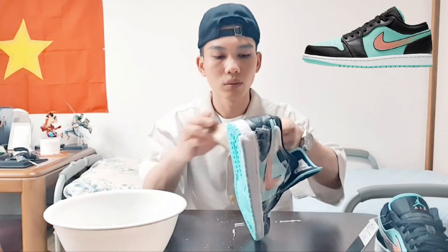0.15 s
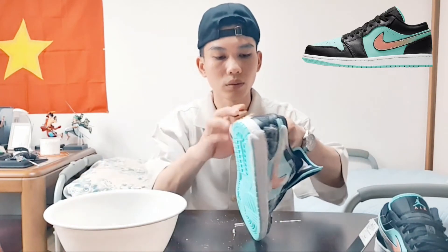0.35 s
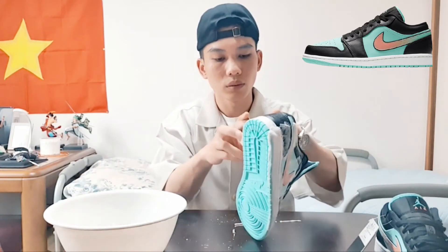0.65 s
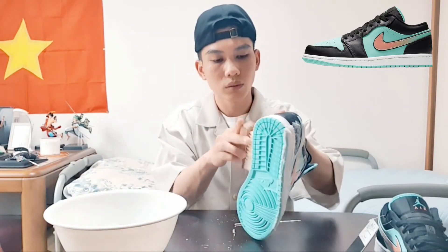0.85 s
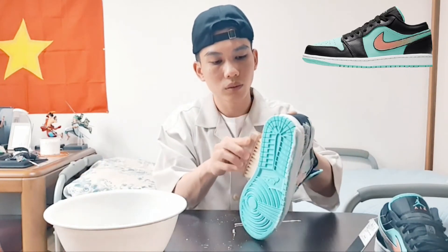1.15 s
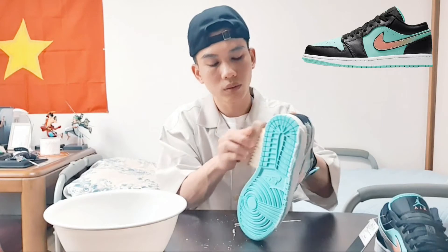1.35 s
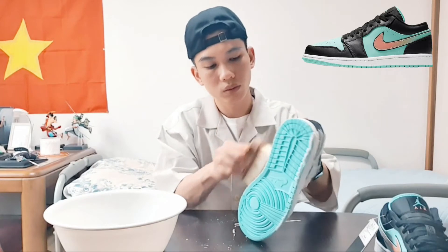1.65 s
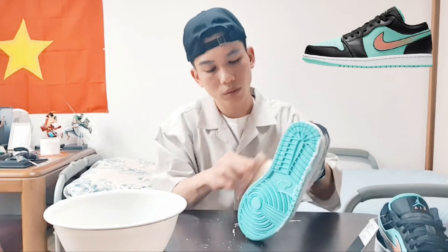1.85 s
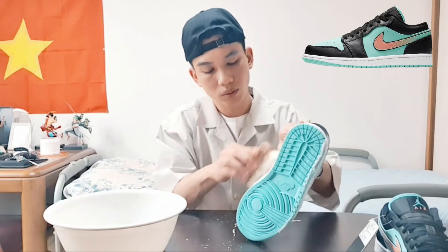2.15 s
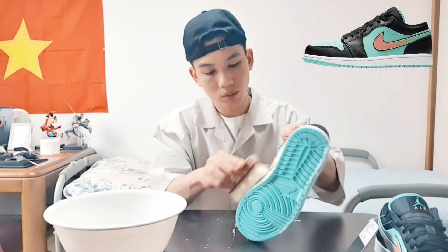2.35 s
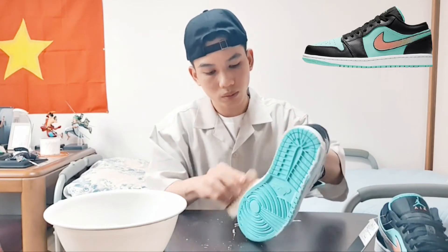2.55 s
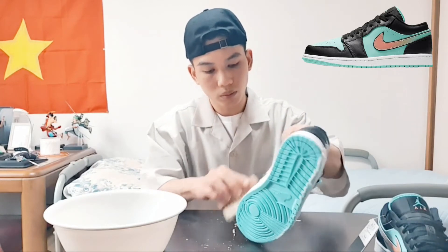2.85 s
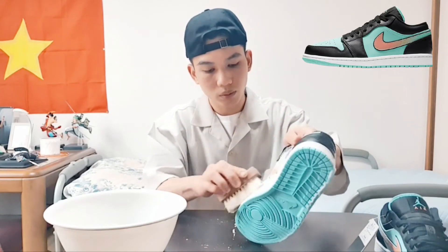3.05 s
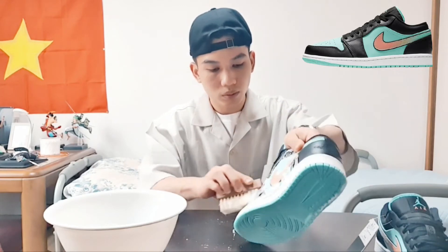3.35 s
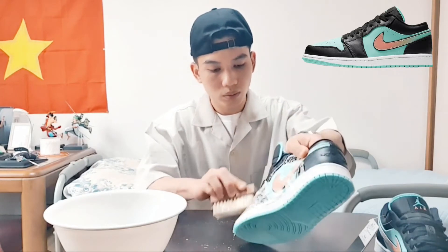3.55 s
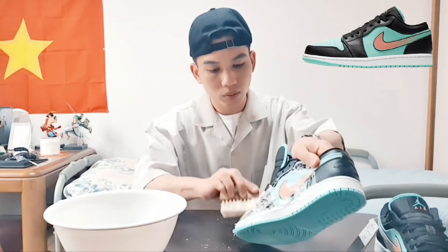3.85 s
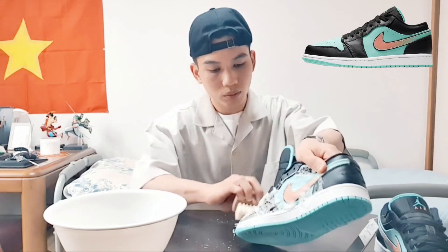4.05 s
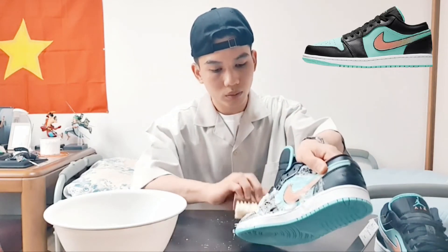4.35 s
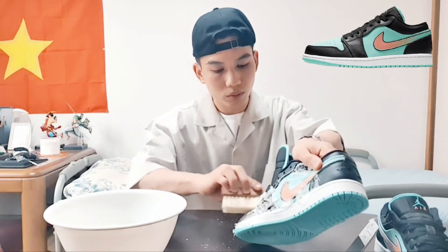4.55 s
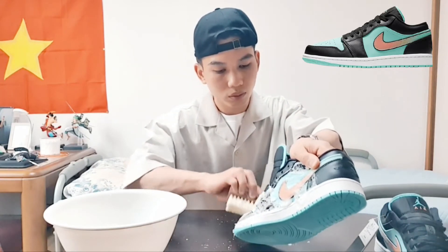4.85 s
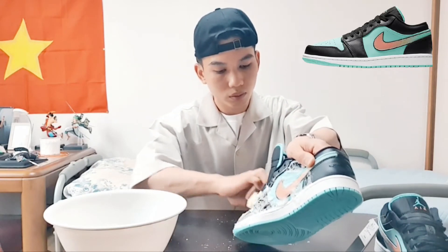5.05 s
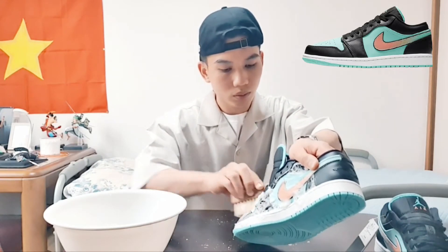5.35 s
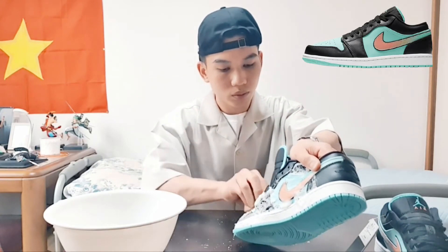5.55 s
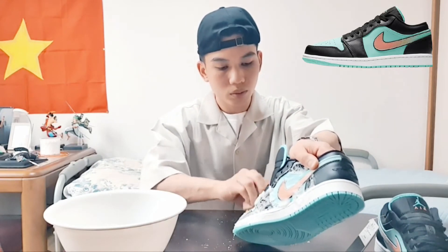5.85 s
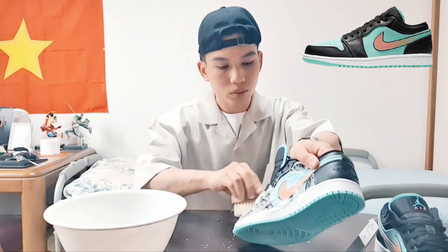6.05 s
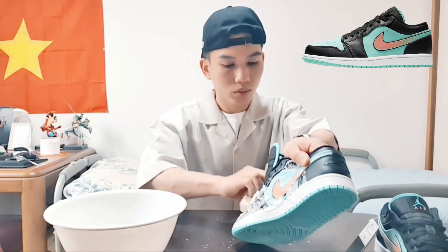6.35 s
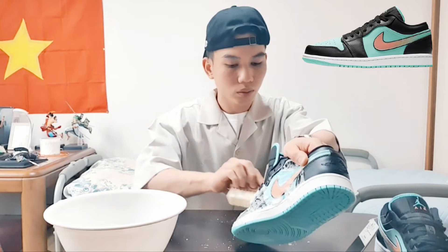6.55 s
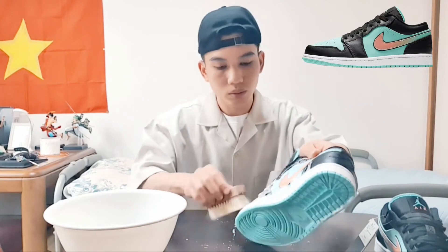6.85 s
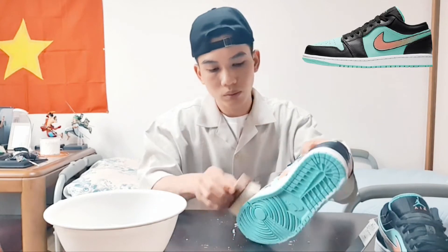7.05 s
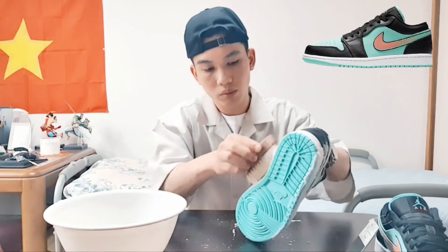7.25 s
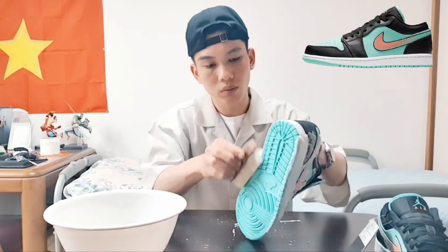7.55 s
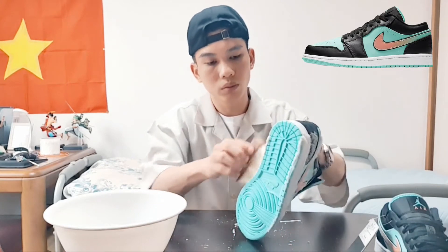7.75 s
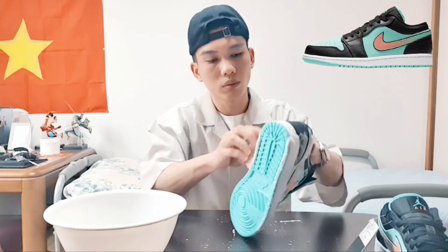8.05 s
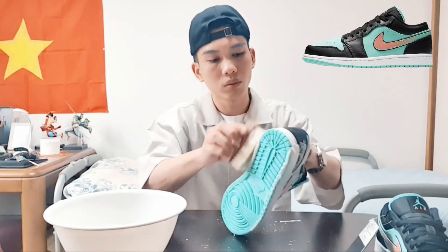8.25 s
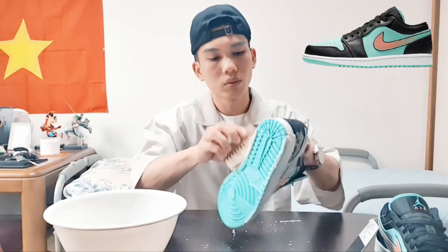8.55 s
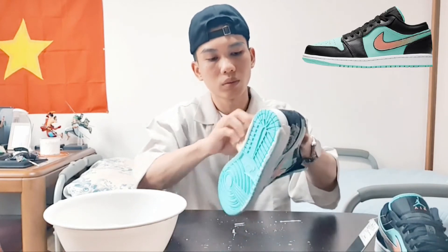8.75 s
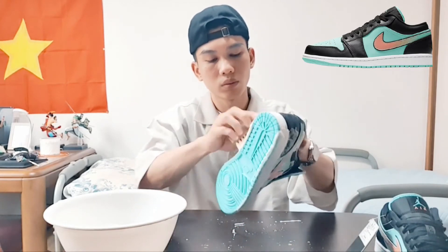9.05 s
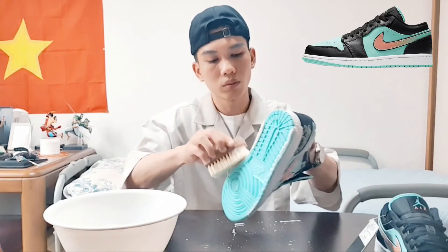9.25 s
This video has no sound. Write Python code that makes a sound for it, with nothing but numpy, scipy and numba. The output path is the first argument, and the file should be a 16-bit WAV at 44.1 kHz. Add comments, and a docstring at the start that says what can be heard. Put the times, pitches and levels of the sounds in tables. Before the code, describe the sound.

A wet bristle brush scrubs a sneaker in quick short strokes, about six or seven a second, with one dull table knock early on.

```python
"""Faint room tone and a soft hollow rub come first; then a wet brush scrubs a shoe held over a table.
Each second thousands of bristle slips, as random impulses, excite hiss, fizz and the patch of leather.
A slower shower of catching tufts excites the modes of the hollow shoe and of the table top.
The heel knocks the table, once hard. Hollow knocks of the shoe, with early wall echoes, are mostly taps
of the brush back, one from the hard heel knock and some soft rubs."""
import sys
import numpy as np
from scipy import signal
from scipy.fft import rfft, irfft, next_fast_len
from scipy.io import wavfile
from numba import njit

SR = 44100
rng = np.random.default_rng(int(sys.argv[2]) if len(sys.argv) > 2 else 0)


def wrap_up_sound(samples):
    """Save the sound to the file named by the first command line argument, as 16-bit audio."""
    columns = np.atleast_2d(samples).T
    # keep every value between -1 and 1, then stretch to whole-number steps
    tamed = np.clip(columns, -1, 1)
    steps = np.round(tamed * 32767).astype(np.int16)
    wavfile.write(sys.argv[1], SR, steps)


N = 414981

# Brush strokes: (time of greatest speed [s], rise over 10 dB [s], fall over 10 dB [s], bristle hiss [dB],
# hollow shoe re hiss [dB], wet fizz re hiss [dB], patch ring re hiss [dB],
# pitch region of the shoe shaken most [Hz], nominal patch pitch, which two resonances straddle [Hz])
STROKES = [(0.021, 0.034, 0.14, -86.0, 17, 4, -0.5, 540.0, 2460.0),
           (0.338, 0.091, 0.071, -75.5, 8.5, 0.5, 2, 593, 2900.0),
           (0.455, 0.046, 0.045, -74, 9.0, 4, 1.5, 560.0, 2740.0),
           (0.581, 0.067, 0.067, -65.5, 6.5, 5.0, -1.5, 513, 2620.0),
           (0.78, 0.16, 0.21, -74.5, 9.5, 9, 0, 460, 2570.0),
           (0.879, 0.043, 0.053, -71.5, 10.5, -11, 3, 333, 3080.0),
           (0.994, 0.06, 0.044, -73.5, 10.5, -2.0, -3.0, 380.0, 2970.0),
           (1.127, 0.067, 0.032, -54, -3.0, 2.5, 2.5, 630.0, 3150.0),
           (1.298, 0.19, 0.117, -54, 3.5, 6.5, 5, 768, 3070),
           (1.462, 0.13, 0.069, -43.5, 0, 2.5, 2.5, 590.0, 2970),
           (1.598, 0.055, 0.164, -44.5, -2, 1.5, 1.5, 600, 3030),
           (1.773, 0.075, 0.11, -40.5, 0, 0.0, -1.5, 496, 3245),
           (1.977, 0.068, 0.063, -44.5, -3.5, 2.5, -1, 560.0, 3470.0),
           (2.134, 0.079, 0.12, -42.5, 1.0, 0, -2, 566, 3170),
           (2.32, 0.032, 0.069, -48.5, -2.5, -1, 3, 556, 3640.0),
           (2.49, 0.09, 0.071, -41.5, 0, -0.5, -3.0, 606, 3200),
           (2.613, 0.046, 0.036, -50.5, 0, -1, -5.0, 650.0, 3600.0),
           (2.801, 0.055, 0.058, -43, 0, 0.5, -4, 710.0, 2900),
           (2.889, 0.18, 0.14, -48.0, 2, -1.0, -8, 654, 3200),
           (3.087, 0.049, 0.064, -42.5, -0.5, -4.5, -10, 613, 2520.0),
           (3.183, 0.03, 0.091, -48.5, 2.0, -4, -9, 650.0, 2660.0),
           (3.397, 0.081, 0.036, -49.0, 2.5, -9.0, -10, 584, 3010.0),
           (3.502, 0.073, 0.078, -48.0, 0, -3.5, -8, 620.0, 2740.0),
           (3.668, 0.052, 0.088, -44, -1, -8, -7.5, 680.0, 2830.0),
           (3.819, 0.074, 0.067, -49, 2.5, -4, -2.0, 730.0, 2640.0),
           (3.956, 0.062, 0.081, -45.5, 0.5, -10, -9, 640.0, 3080.0),
           (4.109, 0.1, 0.086, -47, 1.5, -5.5, -7, 664, 2800.0),
           (4.308, 0.08, 0.065, -46, 0.5, -10, -10, 696, 2900.0),
           (4.455, 0.13, 0.06, -47, 0, -9, -12, 720.0, 2670.0),
           (4.558, 0.052, 0.24, -44.5, -1.5, -13.0, -16, 680, 2760),
           (4.772, 0.13, 0.17, -51, -1, -6.0, -10, 680.0, 2570.0),
           (5.073, 0.042, 0.12, -49.5, -1.5, -11, -7.5, 596, 2950.0),
           (5.33, 0.12, 0.041, -67.5, 8.5, -13, -2, 520.0, 3930.0),
           (5.456, 0.11, 0.072, -52.5, 2.5, -16, -15, 534, 2870.0),
           (5.552, 0.071, 0.1, -55.0, 2.5, -5.5, -7.5, 600, 2990),
           (5.749, 0.04, 0.03, -54.5, 4.5, -22, -12, 460.0, 2890.0),
           (5.873, 0.11, 0.095, -48.0, 0.5, -5, -16, 580, 2900),
           (6.001, 0.03, 0.16, -79, 4, -3.0, -1.0, 440.0, 2790.0),
           (6.21, 0.03, 0.18, -72, 15, -10, -19, 540.0, 2300.0),
           (6.344, 0.088, 0.14, -47.5, -1.5, -12, -12.5, 514, 2950),
           (6.704, 0.096, 0.076, -46.5, -2, -2, -11, 610.0, 2620.0),
           (6.92, 0.12, 0.03, -64.0, 7, -4.5, -21, 510.0, 2300.0),
           (7.04, 0.084, 0.042, -47, -1, 1, -27, 627, 3550.0),
           (7.085, 0.03, 0.072, -41, -1, 1, 1.5, 513, 3220),
           (7.27, 0.046, 0.077, -42.5, -2, 2, -2, 546, 3480),
           (7.467, 0.057, 0.097, -43, -2.5, 2.5, 2, 610.0, 3430.0),
           (7.697, 0.085, 0.16, -43.5, -3, -0.5, -1, 580, 3120.0),
           (7.822, 0.03, 0.048, -47, -3.0, 2, -4, 770.0, 2850.0),
           (7.897, 0.031, 0.029, -44.5, -1, 2.0, 1.0, 890, 2510),
           (7.983, 0.12, 0.14, -43, -3.5, -5, -0.5, 530, 2820.0),
           (8.125, 0.09, 0.034, -44.5, -2.5, -5, 0.5, 320.0, 2800),
           (8.242, 0.18, 0.072, -47.5, -6.5, 1.5, 2.5, 680.0, 2700),
           (8.359, 0.074, 0.084, -43, -3.5, -1.5, 2.5, 600.0, 2780),
           (8.51, 0.058, 0.1, -45, -5, -0.5, 2, 617, 2650),
           (8.72, 0.12, 0.17, -43.5, -4.5, -3.5, -0.5, 590, 2730.0),
           (8.805, 0.046, 0.054, -52, 1.5, 8, 10.5, 530.0, 2910.0),
           (8.911, 0.044, 0.049, -46, -5, -2, -2.0, 710.0, 2500),
           (9.076, 0.12, 0.139, -40.5, -5.0, -1.0, 2.5, 540.0, 2910.0),
           (9.283, 0.098, 0.052, -42.5, -7.5, -4.0, -2, 575, 2890.0),
           (9.395, 0.078, 0.03, -43.0, -6.5, -5, 0, 544, 2620)]
# Heel on the table top: (nominal time [s], relative strength [dB])
HEEL_KNOCKS = [(0.029, -57), (0.562, -52), (1.683, -10), (2.292, -35), (2.672, -33), (2.815, -32.5),
               (2.956, -40.5), (3.097, -35.5), (3.191, -38), (3.899, -41), (4.27, -42), (4.588, -37.5),
               (5.79, -43), (7.087, -35), (8.054, -39)]
# Hollow knocks of the shoe, mostly taps of the brush back, one from the hard heel knock, some soft rubs:
# (time [s], relative strength [dB], pitch region excited [Hz], dry crack drive [dB])
SHOE_KNOCKS = [(0.316, -74, 404, -70), (.45, -55, 676, -80), (.572, -53, 497, -65), (.88, -53, 510, -70),
               (1.685, -34, 380, -70), (2.789, -31, 650, -50), (3.898, -33, 313, -28.5),
               (3.922, -34, 460, -60), (4.227, -37.5, 450, -51.5), (4.244, -39, 470, -60),
               (4.536, -38, 910, -48), (4.549, -32, 1260, -55), (5.689, -39, 386, -46),
               (6.02, -59, 295, -75), (6.111, -54.5, 278, -70), (6.172, -53, 750, -72),
               (6.185, -49, 1000, -72), (6.199, -47, 433, -57), (6.569, -48, 514, -58),
               (6.619, -44, 660, -45), (6.801, -63, 600, -65), (6.85, -60, 420, -75),
               (6.875, -58, 700, -70)]
# Modes of the table top: (frequency [Hz], relative level [dB], 60 dB decay time [s])
TABLE_MODES = [(47, -18, 0.5), (86.6, -20, 0.54), (114.8, 0, 0.15), (118.84, 0.5, 0.17), (137, -12.5, 0.21),
               (167.3, -14.5, 0.24), (231, 2, 0.053), (259, -6.5, 0.17)]
# Modes of the hollow shoe: (frequency [Hz], relative level [dB], 60 dB decay time [s])
SHOE_MODES = [(312.7, 0, 0.061), (379.5, -5.5, 0.071), (429, -9.5, 0.032), (483.6, -1.5, 0.043),
              (552.5, -6, 0.059), (696, -4.5, 0.038), (779, -0.5, 0.024), (1010, 5.5, 0.0098),
              (1248, -4, 0.053), (1550, -2.5, 0.068)]
# Modes of the dry crack: (frequency [Hz], relative level [dB], 60 dB decay time [s])
CRACK_MODES = [(840, 9.5, 0.0058), (1360, 1, 0.0062), (1940, 0, 0.0099), (3330, 2.5, 0.0074)]
# Spectrum of bristle hiss: (frequency [Hz], relative density [dB per Hz])
HISS_SPECTRUM = [(350, -21), (700, -8.5), (1100, 0), (1700, -1), (2600, -7), (4000, -5), (6000, -11.5),
                 (8000, -27)]
# Spectrum of wet fizz: (frequency [Hz], relative density [dB per Hz])
FIZZ_SPECTRUM = [(1800, -37), (4000, 0.5), (6000, 0.5), (7600, -4), (9500, -5), (11500, -5), (13500, -9),
                 (16000, -10)]
# Spectrum of the room tone: (frequency [Hz], relative density [dB per Hz])
AIR_SPECTRUM = [(20, -26), (60, 4), (150, -6.5), (500, -13.5), (1500, -21.5), (5000, -29.5), (16000, -39)]
# Likeness of the left and right sound: (frequency [Hz], likeness, 1 = the same [ratio])
LIKENESS = [(60, 0.81), (300, 0.93), (700, 0.81), (1200, 0.54), (2500, 0.47), (5000, 0.25), (10000, 0.2)]
# Firmness of the heel on the table, as rumble: (time [s], level re hiss [dB])
HEEL_PRESSURE = [(0.0, 12), (0.3, -12), (1.1, -20.5), (1.9, -14.5), (2.7, -10.5), (3.2, -9.5), (3.7, -14),
                 (4.2, -7), (4.45, -22), (4.6, -10.5), (4.85, -22.5), (5.4, -8.5), (5.6, -13), (5.85, -10),
                 (6.7, -9), (7.3, -13), (7.8, -18), (8.15, -14.5), (8.4, -30), (9.41, -34)]

PEAK_S, RISE_S, FALL_S, HISS_DB, SHOE_DB, FIZZ_DB, PATCH_DB, SHOE_HZ, PATCH_HZ = np.transpose(STROKES)
AIR_DB = -73
CUTOFF_HZ = 15420
LEFT_LEAD_SAMPLES, LEFT_DB = 3, 1.4
# how steeply each layer follows the stroke's speed, re hiss; and how late it peaks (negative: early)
SHOE_STEEP, FIZZ_STEEP, TABLE_STEEP = 0.85, 1.15, 0.39
SHOE_LATE_S, FIZZ_LATE_S = -0.0056, 0.0038
STEP = 64   # samples between points of the stroke envelopes


def from_db(db):
    """A level of 20 dB is a tenfold amplitude."""
    return 10 ** (np.asarray(db) / 20)


def rms_one(x):
    """Normalization to unit root-mean-square amplitude."""
    return x / np.sqrt(np.mean(x ** 2) + 1e-20)


def at_hz(points, size):
    """A spectrum is interpolated over log frequency on the bins of a transform."""
    hz = np.maximum(np.arange(size // 2 + 1) * SR / size, 10)
    table_hz, values = np.transpose(points)
    return np.interp(np.log(hz), np.log(table_hz), values)


def colour(x, spectrum):
    """Linear filtering: a broadband source takes the shape of a spectrum, at unit rms."""
    size = next_fast_len(N)
    shaped = rfft(x, size) * from_db(at_hz(spectrum, size))
    return rms_one(irfft(shaped, size)[..., :N])


def ring(x, modes, centre_hz=1, fall_db=0):
    """Modal superposition: modes far from centre_hz are driven less, fall_db per octave squared."""
    out = 0
    for k, (hz, level_db, t60) in enumerate(modes):
        radius = from_db(-60 / (t60 * SR))
        w = 2 * np.pi * hz / SR
        drive = x * from_db(level_db - fall_db * np.log2(hz / centre_hz) ** 2)
        poles = [1, -2 * radius * np.cos(w), radius * radius]
        mode = signal.lfilter([0, np.sin(w)], poles, drive + 1e-18)
        # neighbouring pairs of modes swing opposite ways
        out = out + (-1) ** ((k + 1) // 2) * mode
    return out


def small_body(x):
    """Radiation efficiency: a body as small as a shoe radiates little bass."""
    return signal.sosfilt(signal.butter(4, 270.0, "high", fs=SR, output="sos"), x)


def at_samples(coarse):
    """Linear interpolation from envelope points to samples."""
    return np.interp(np.arange(N) / STEP, np.arange(len(coarse)), coarse)


def strokes(level_db, steep=1, late_s=0):
    """Each stroke speeds up and slows down as a bell in dB; rows are the strokes' powers."""
    since = np.arange(0, N + STEP, STEP) / SR - PEAK_S[:, None] - late_s
    width_s = np.where(since < 0, RISE_S[:, None], FALL_S[:, None])
    away = since / np.maximum(width_s, .005)
    drop_db = np.minimum(10 * steep * away ** 2, 200)
    return from_db(2 * (level_db[:, None] - drop_db))


def swell(level_db, steep=1, late_s=0):
    """Incoherent addition: overlapping strokes add in power."""
    return at_samples(np.sqrt(strokes(level_db, steep, late_s).sum(axis=0)))


def gliding_pitch(stroke_hz):
    """Power weighting: the loudest stroke dominates the pitch."""
    power = strokes(HISS_DB)
    return at_samples(stroke_hz @ (power / power.sum(axis=0)))


def slips(per_s, size_db, clump_db, clump_hz):
    """Stick-slip friction: two unrelated showers of uneven slips, as tufts let go in clumps."""
    low_pass = signal.butter(2, clump_hz, fs=SR, output="sos")
    clumps = rms_one(signal.sosfilt(low_pass, rng.standard_normal(N)))
    sizes = from_db(size_db * np.minimum(rng.exponential(1, (2, N)), 5))
    signed_sizes = sizes * rng.choice([-1, 1], (2, N))
    happens = rng.random((2, N)) < per_s / SR
    return signed_sizes * happens * from_db(clump_db * clumps)


def blows(times, strength_db, contact_s):
    """Contact mechanics: a soft blow is a Hann pulse of set area, about contact_s long."""
    clicks = np.zeros(N)
    clicks[np.round(times * SR).astype(int)] = from_db(strength_db)
    pulse = np.hanning(int(contact_s * SR) + 3)
    return signal.oaconvolve(clicks, pulse / pulse.sum())[:N]


@njit
def moving_resonance(x, hz, radius):
    """A two-pole resonance whose centre (cycles per sample) glides."""
    y = np.zeros_like(x)
    for i in range(2, x.shape[1]):
        pull = 2 * radius * np.cos(2 * np.pi * hz[i])
        for row in range(x.shape[0]):
            driven = x[row, i] - x[row, i - 2]
            y[row, i] = driven + pull * y[row, i - 1] - radius * radius * y[row, i - 2]
    return y


def room_tone():
    """Stationary noise: unrelated random pressure in each row, mostly low in pitch."""
    return from_db(AIR_DB) * colour(rng.standard_normal((2, N)), AIR_SPECTRUM)


def hollow_shoe(pushes):
    """Forced vibration: catching tufts shake the modes near each stroke's pitch region."""
    hollow = small_body(ring(pushes, SHOE_MODES, gliding_pitch(SHOE_HZ), fall_db=8.5))
    return swell(HISS_DB + SHOE_DB, SHOE_STEEP, SHOE_LATE_S) * rms_one(hollow)


def table_rumble(pushes):
    """Structure-borne sound: the heel passes the pushes on to the table, more when it rests firmly."""
    heel_s, heel_db = np.transpose(HEEL_PRESSURE)
    pressure = from_db(np.interp(np.arange(N) / SR, heel_s, heel_db))
    return swell(HISS_DB, TABLE_STEEP) * pressure * rms_one(ring(pushes, TABLE_MODES))


def wet_fizz(shower):
    """Broadband excitation: the slips of the wet bristles heard in the high treble."""
    return swell(HISS_DB + FIZZ_DB, FIZZ_STEEP, FIZZ_LATE_S) * colour(shower, FIZZ_SPECTRUM)


def bristle_hiss(shower):
    """Shot noise: many small random slips merge into a hiss."""
    return swell(HISS_DB) * colour(shower, HISS_SPECTRUM)


def leather_patch(shower):
    """Coupled resonance: two resonances in series give a broad top and steep flanks."""
    pitch = gliding_pitch(PATCH_HZ) / SR
    radius = np.exp(-np.pi * 1700.0 / SR)   # bandwidth of each resonance, Hz
    patch = moving_resonance(shower, 0.74 * pitch, radius)
    patch = moving_resonance(patch, 1.034 * pitch, radius)
    return swell(HISS_DB + PATCH_DB) * rms_one(patch)


def scrubbing():
    """Common excitation: layers share showers of slips; rows are (shared, unshared) sound."""
    shower = slips(per_s=9000, size_db=1.5, clump_db=0.5, clump_hz=58.0)
    pushes = slips(per_s=2500, size_db=2.5, clump_db=1.3, clump_hz=25.0)   # whole tufts catching
    body = hollow_shoe(pushes) + table_rumble(pushes)
    return body + wet_fizz(shower) + bristle_hiss(shower) + leather_patch(shower)


def heel_knocks():
    """Impact excitation: soft blows of the heel ring the table's modes, most near 116 Hz."""
    knock_s, knock_db = np.transpose(HEEL_KNOCKS)
    force = blows(knock_s - .0065, knock_db + 2.5, contact_s=0.0061)
    return -ring(force, TABLE_MODES, 116.0, fall_db=10.0)


def shoe_knocks():
    """Local excitation: each knock rings the shoe's modes near its pitch region and adds a dry crack."""
    knock_s, knock_db, knock_hz, crack_db = np.transpose(SHOE_KNOCKS)
    # the latest knock sets the region, from 1 ms ahead
    latest = np.searchsorted(knock_s, np.arange(N) / SR + .001) - 1
    excited_hz = knock_hz[np.maximum(latest, 0)]
    force = blows(knock_s, knock_db + 7.0, contact_s=0.00097)
    shoe = small_body(ring(force, SHOE_MODES, excited_hz, fall_db=53.0))
    crack = ring(blows(knock_s + 0.00137, crack_db, contact_s=.0001), CRACK_MODES)
    return shoe + crack


def wall_echoes(x):
    """Early reflection: a handful of delayed, weakened copies, other ones in each row."""
    out = np.zeros((2, N))
    lags = (rng.uniform(0.00458, 0.04, 12) * SR).astype(int)
    for k, lag in enumerate(lags):
        gain = from_db(-9.0 - 300.0 * lag / SR)   # later echoes are weaker
        out[k % 2, lag:] += x[:-lag] * gain * (-1) ** (k // 2)
    return out


def two_ports(pair):
    """Interaural coherence: shared and unshared sound mix by likeness; left is earlier and louder."""
    size = next_fast_len(N)
    alike = np.clip(at_hz(LIKENESS, size), 0, 1)
    shared, unshared = rfft(pair, size)
    common = np.sqrt((1 + alike) / 2) * shared
    opposed = np.sqrt((1 - alike) / 2) * unshared
    lead = np.exp(2j * np.pi * np.arange(len(common)) / size * LEFT_LEAD_SAMPLES)
    left = (common + opposed) * lead * from_db(LEFT_DB / 2)
    right = (common - opposed) * from_db(-LEFT_DB / 2)
    return irfft(np.array([left, right]), size)[:, :N]


def scene():
    """Linear superposition of all sources; the direct knocks are shared sound only."""
    air = room_tone()
    scrub = scrubbing()
    table = heel_knocks()
    shoe = shoe_knocks()
    direct = (table + shoe) * [[1], [0]]
    return two_ports(air + scrub + direct + wall_echoes(shoe))


def record(dry):
    """Band limiting: a steep elliptic low-pass cuts the top."""
    return signal.sosfilt(signal.ellip(12, .5, 70, CUTOFF_HZ, fs=SR, output="sos"), dry)


dry = scene()
out = record(dry)
wrap_up_sound(out)
```